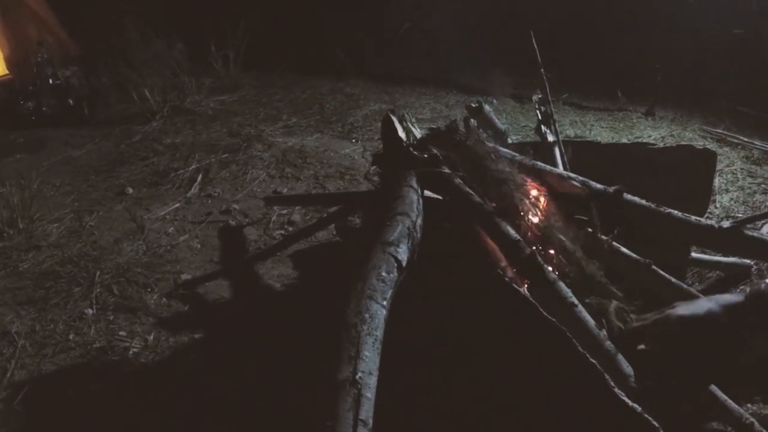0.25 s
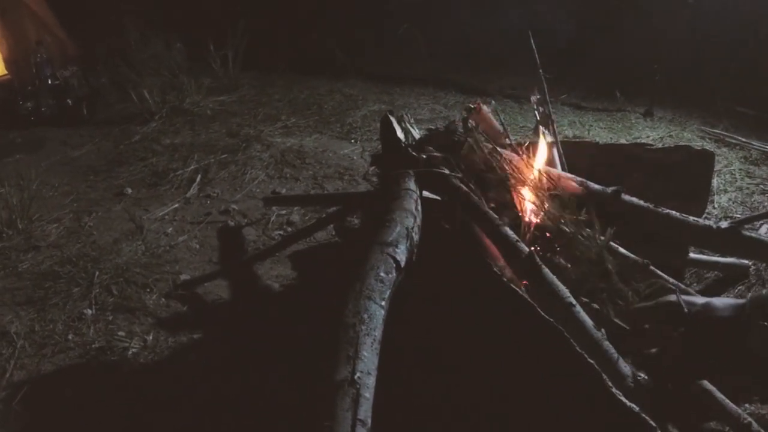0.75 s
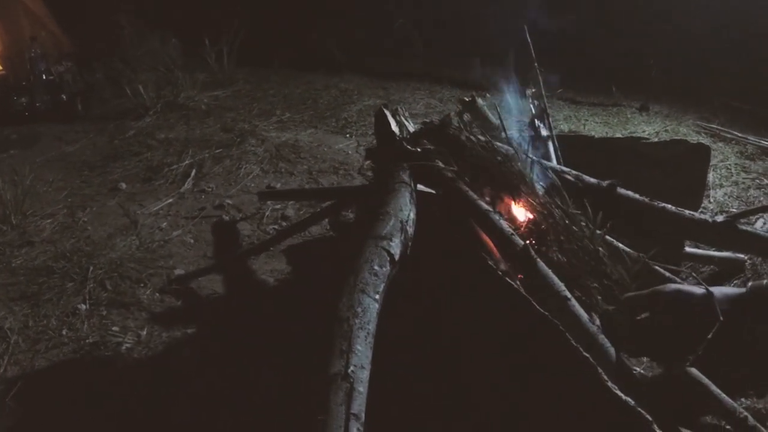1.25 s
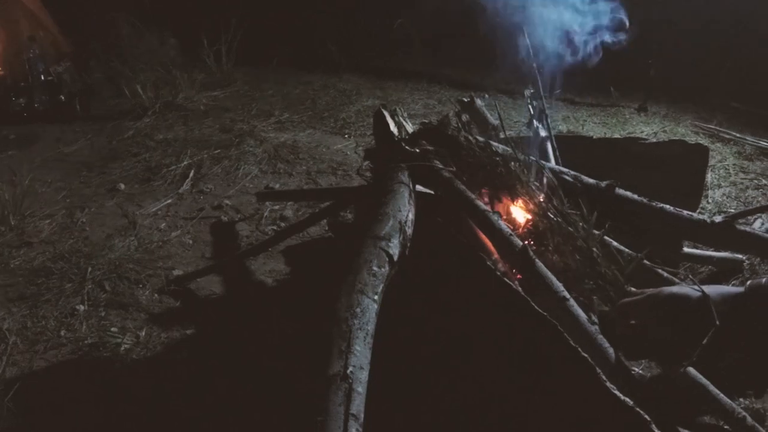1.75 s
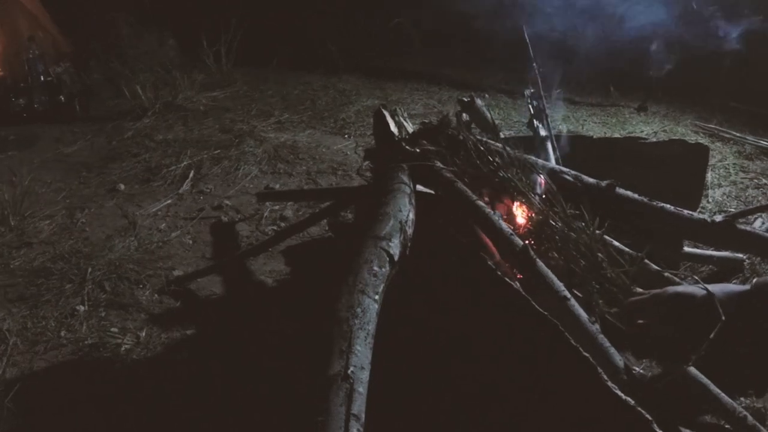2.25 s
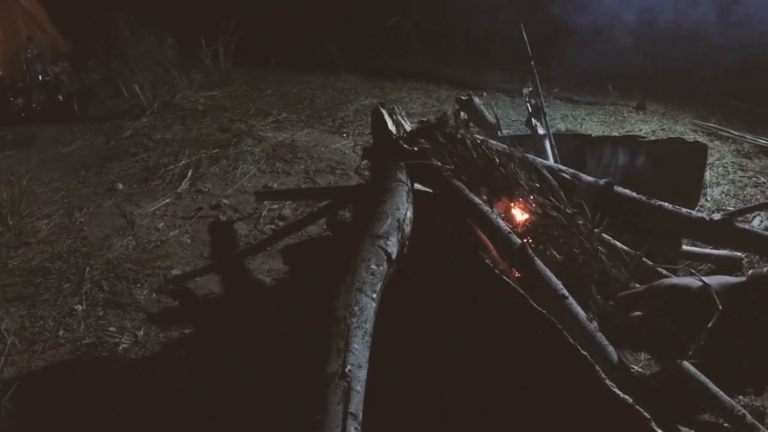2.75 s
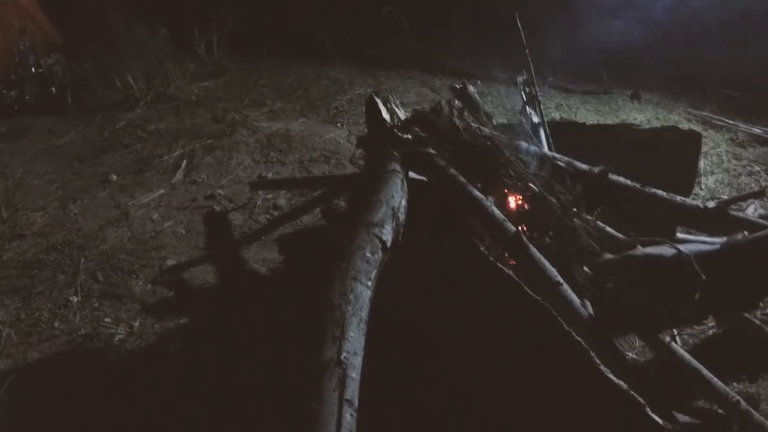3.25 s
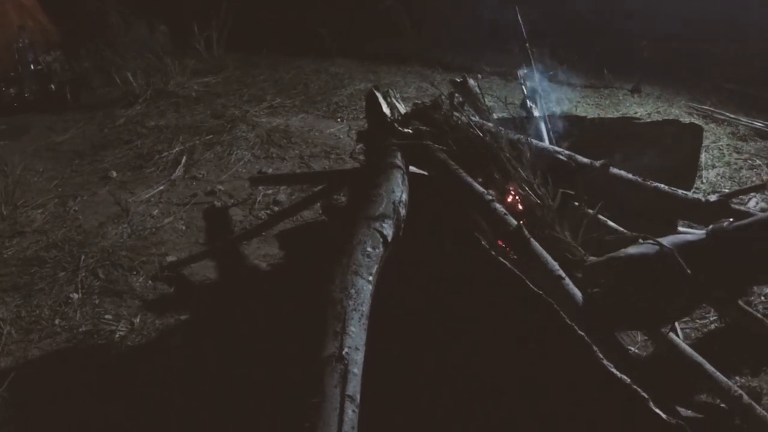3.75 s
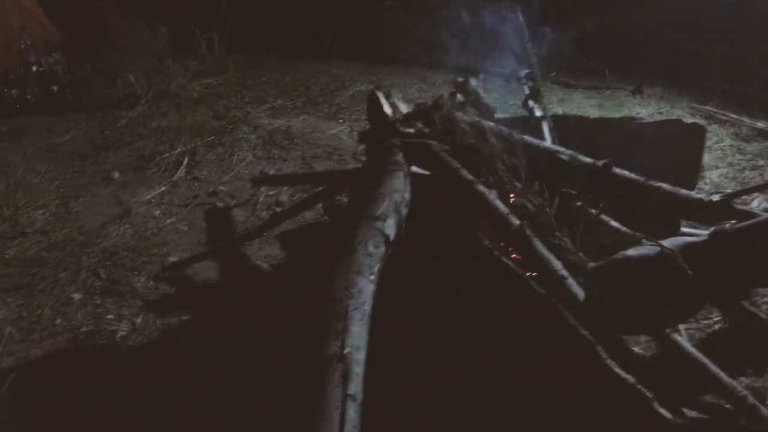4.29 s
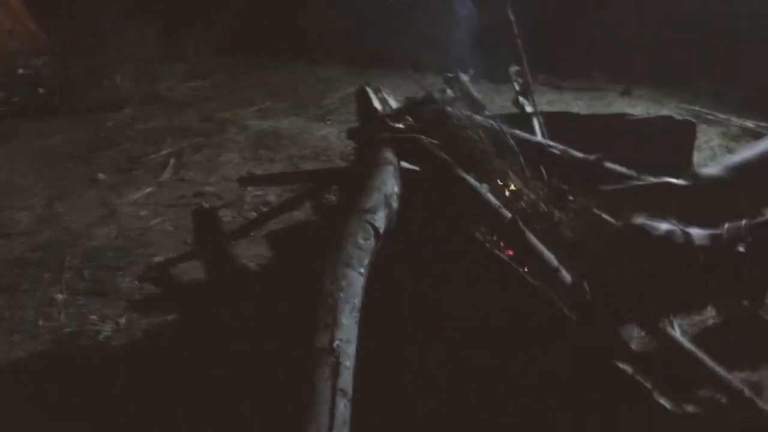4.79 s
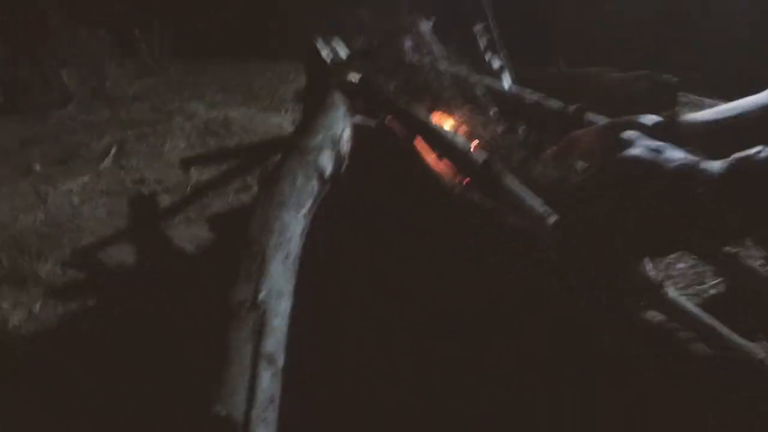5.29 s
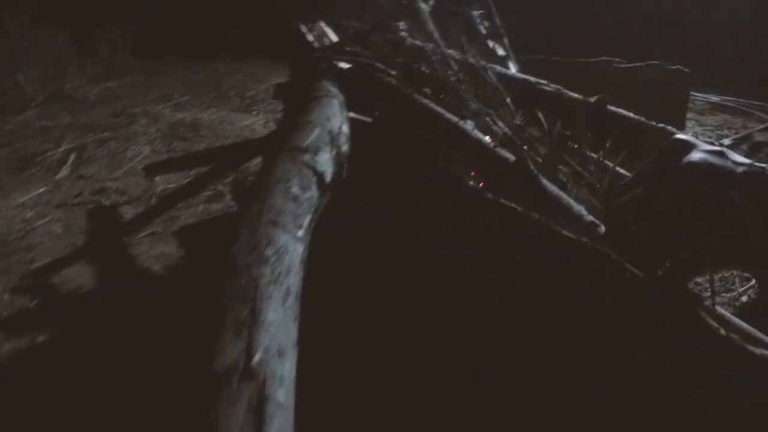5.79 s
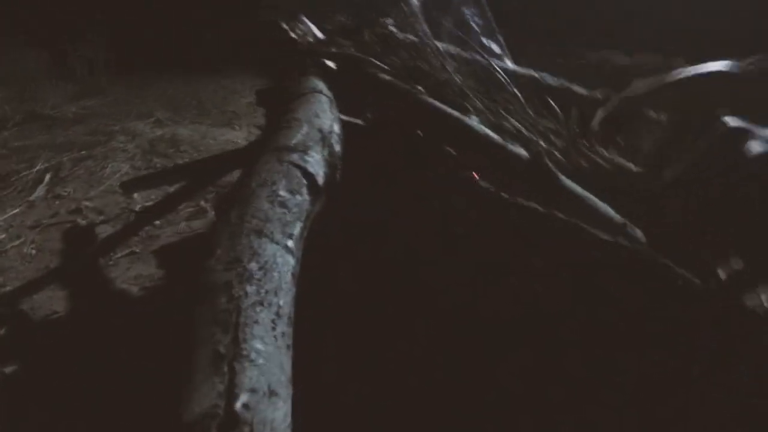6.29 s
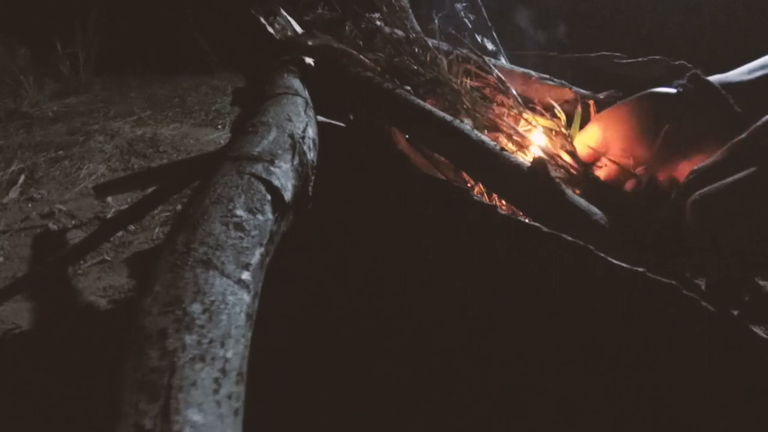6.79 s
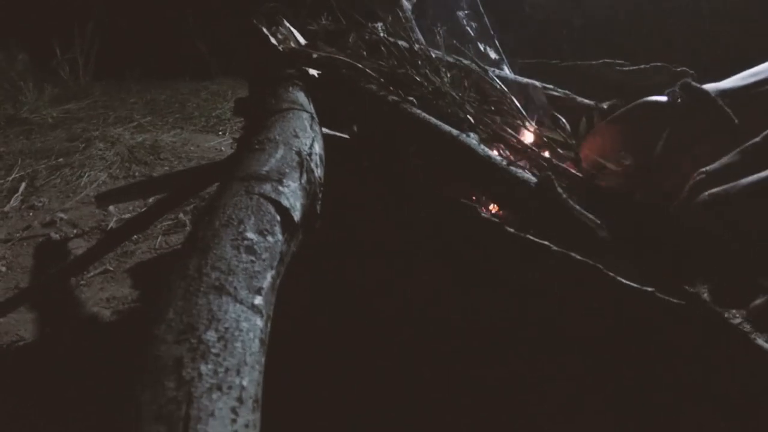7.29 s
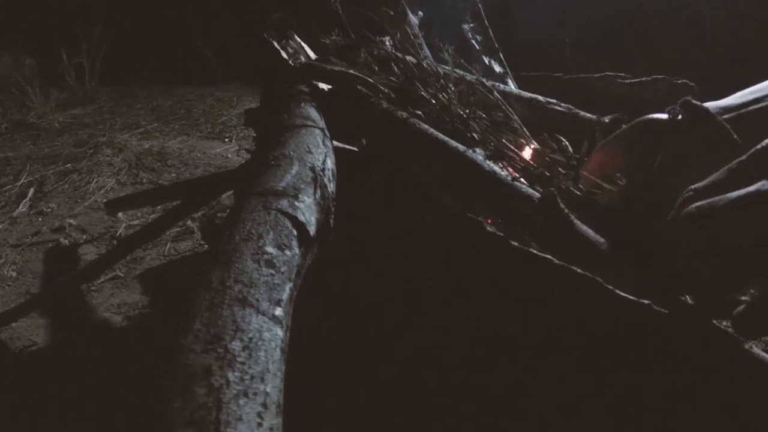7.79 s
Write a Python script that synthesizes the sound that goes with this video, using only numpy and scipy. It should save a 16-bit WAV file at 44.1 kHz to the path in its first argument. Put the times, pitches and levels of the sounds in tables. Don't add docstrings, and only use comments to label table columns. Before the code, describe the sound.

A quiet open-air night, in stereo. From 0 s a near cricket, slightly left, gives quick double chirps around 5 kHz, roughly five a second, over a dense shimmer of distant crickets and katydid trills and a very high buzz. Underneath, a far single-cylinder engine putters softly, quickening slightly after 2 s, with dull air rumble and barely felt breeze. Faint brushes of grass or sleeve pass; a tiny bump at 2.6 s, dry twig ticks near 4 s. At 4.35-4.55 s a hand shifts on the microphone: a cluster of hard, dry knocks and scuffs, the sharpest at 4.53 s, heavily right and overloading. Small thumps, twig ticks and cloth rustle trail to 5.7 s. A higher cricket enters at 5.2 s in paired notes. Soft bumps at 6.2-6.5 s, then at 6.68 s one short, bright flint-wheel scrape with metallic click. Insects swell gently to 8 s.

```python
import sys
import numpy as np
from scipy import signal
from scipy.io import wavfile
from scipy.ndimage import uniform_filter1d

SR = 44100
rng = np.random.default_rng(int(sys.argv[2]) if len(sys.argv) > 2 else 0)


def makeup_ratio(level_db):
    decades = np.asarray(level_db, float) / 20
    return 10 ** decades


def inscribe(sig):
    pcm = np.round(np.clip(np.atleast_2d(sig).T, -1, 1) * 32767)
    wavfile.write(sys.argv[1], SR, pcm.astype(np.int16))


N = 354563


def curve_at(curve, s):
    t, *columns = np.transpose(curve)
    return [np.interp(s, t, c) for c in columns]


def in_time(rows, silent=False):
    s = np.transpose(rows)[0]
    t = np.arange(N) / SR
    out = curve_at(rows, t)
    if silent:
        out[0] = np.where((t < s[0]) | (t > s[-1]), -200, out[0])
    return out


def rms_one(x):
    return x / np.sqrt(np.mean(x ** 2) + 1e-20)


def sides(pan_db):
    left = makeup_ratio(np.asarray(pan_db))
    return np.array([left, np.ones_like(left)]) * np.sqrt(2 / (1 + left ** 2))


def drift(rate):
    r = np.exp(-80 * np.pi * rate / SR)
    white = rng.standard_normal(N // 40 + 2002)
    slow = signal.lfilter([1], [1, -2 * r, r * r], white)[2000:]
    return np.interp(np.arange(N) / 40, np.arange(len(slow)), rms_one(slow))


def sos(x, design):
    return signal.sosfilt(design, x)


def band(x, hz, width_hz):
    edges = np.clip([hz - width_hz / 2, hz + width_hz / 2], 20, .45 * SR)
    return sos(x, signal.butter(2, edges, "band", fs=SR, output="sos"))


def add(out, s, sound):
    i = max(round(s * SR), 0)
    out[:, i:i + sound.shape[1]] += sound[:, :max(N - i, 0)]


def swells(rows):
    s, peak_db, rise, fall = np.array(rows)[:, :4, None].transpose(1, 0, 2)
    late = np.arange(N) / SR - s
    return makeup_ratio(peak_db - 20 * np.where(late < 0, -late / rise, late / fall))


def blows(table):
    out = np.zeros((2, N))
    for s, peak_db, hz, t60_ms, pan_db in table:
        t60_s = t60_ms / 1000
        t = np.arange(round(t60_s * SR)) / SR
        onset = (1 - np.exp(-t * abs(hz) * 5)) ** 2
        ring = -np.sin(2 * np.pi * hz * t) * makeup_ratio(-60 * t / t60_s) * onset
        add(out, s, makeup_ratio(peak_db) * sides(pan_db)[:, None] * ring / np.abs(ring).max())
    return out


def grains(per_s, uneven_db, alike):
    sizes = makeup_ratio(uneven_db * np.minimum(rng.exponential(1, (3, N)), 5)) * rng.choice([-1, 1], (3, N))
    both, left, right = sizes * (rng.random((3, N)) < per_s / SR)
    return rms_one(alike * both + (1 - alike) * np.array([left, right])) + 1e-18


def friction(strokes, pan_db, per_s, uneven_db, alike):
    clicks, gains, out = grains(per_s, uneven_db, alike), swells(strokes), 0
    bright_hz = np.array(strokes)[:, 4]
    for hz in 350 * 2. ** np.arange(6):
        rolloff = (1 + (hz / bright_hz) ** 2) ** -2
        out = out + rms_one(band(clicks, hz, 0.87 * hz)) * np.sqrt(rolloff @ gains ** 2)
    return sides(pan_db) * out


# start_s, left_over_right_db
HAND = [(2.6, -10), (4.33, -20), (4.42, -26), (4.56, -17), (4.66, -4), (5.1, -10), (6.25, -8), (6.4, 0)]


def on_housing(rows):
    return blows([(*row, curve_at(HAND, row[0])[0]) for row in rows])


# start_s, peak_db, ring_hz, t60_ms
KNOCKS = [(2.605, -50, 750, 17), (4.334, -24, 182, 14), (4.388, -22, 280, 10), (4.3915, -23, 294.5, 15),
          (4.3995, -20, 887, 8), (4.4075, -18.5, 364, 20), (4.4107, -18, 950, 12), (4.4135, -17, 1000, 8),
          (4.4163, -13, 800, 4.8), (4.4218, -9.5, 1825, 8.7), (4.4228, -7, 280, 11), (4.4245, -4, 520, 4.5),
          (4.433, -13.5, 1803, 3.7), (4.4335, -18, 250, 22), (4.46, -25.5, 176.8, 29),
          (4.5201, -27, 450, 9), (4.4225, -12, 4300, 3.1), (4.4345, -32, 3400, 4.3), (4.5395, -22, 420, 16),
          (4.5432, -29, 2117, 5), (4.562, -33, 253.3, 30), (4.678, -30, 480, 9), (5.108, -39, 648, 8),
          (5.3695, -38, 640, 6.2), (5.55, -50, 900, 13)]
# start_s, peak_db, ring_hz (negative = outward first), t60_ms, left_over_right_db
SNAP = [
    (4.5296, 2.5, 555, 4, -17),
    (4.5306, -8, 1060, 10, -17),
    (4.5315, -8, 1000, 3.5, -16),
    (4.5304, -7, -210, 12, -20),
]
# start_s, peak_db, ring_hz, t60_ms, left_over_right_db
CRACKS = [(4.4063, -36, 3500, 3, -14), (4.4068, -38, 6500, 2.5, -10), (4.4172, -36, 4500, 3, -12),
          (4.4208, -24, 4200, 3, -12), (4.4216, -24, 6300, 3, -8), (4.4226, -30, 14200, 3, -4),
          (4.4243, -28, 5500, 3, -8), (4.4278, -36, 6000, 2.5, -6), (4.4282, -36, 13500, 3, -4),
          (4.4335, -33, 6000, 3, -8), (4.441, -38, 2500, 4, -10), (4.5205, -34, 2000, 4, -14),
          (4.5297, -24, 3400, 3, -14), (4.5302, -17, 2300, 4, -16), (4.5345, -28, 1800, 8, -16),
          (4.5398, -30, 1700, 5, -16), (4.5298, -36, 8000, 2, -10), (4.8255, -44, 13800, 4, 4),
          (4.8275, -41, 4500, 4, 5), (4.8295, -40, 5500, 3, 5), (4.8305, -44, 11500, 4, 4),
          (4.849, -38, 1700, 6, -3), (4.858, -33, 600, 10, -3), (4.854, -40, 1000, 6, -3),
          (4.6855, -40, 1300, 6, -3), (4.7035, -42, 1700, 5, -3), (4.713, -44, 2000, 5, -3),
          (4.7595, -44, 2400, 4, -2), (4.8595, -37, 1900, 6, -3), (4.8665, -40, 1200, 6, -3),
          (6.6955, -40, 13000, 3, 3), (6.696, -40, 5000, 3, 2)]


def knocks():
    return on_housing(KNOCKS) + blows([*SNAP, *CRACKS])


# start_s, peak_db, ring_hz
THUMPS = [(2.602, -40, 199), (4.683, -38, 315), (4.702, -33, 183), (4.727, -37, 151), (4.76, -38, 291),
          (4.847, -36, 253), (5.085, -32, 215), (5.107, -32, 164), (5.114, -34, 196), (5.127, -39, 156),
          (5.187, -41, 205), (5.259, -39, 283), (5.27, -38, 347), (5.311, -39, 188), (5.368, -36, 188),
          (5.48, -38, 275), (5.545, -41, 151), (5.565, -38, 191), (5.662, -38, 178), (6.232, -36, 250),
          (6.287, -39, 186), (6.411, -38, 296), (6.475, -40, 258), (6.694, -36, 200), (6.704, -35, 235)]


def thumps():
    t60_ms = 28
    return on_housing([(*row, t60_ms) for row in THUMPS])


# peak_s, rms_db, rise_20db_s, fall_20db_s, bright_hz
SCUFF = [
    (4.37, -45, .015, .04, 1300),
    (4.405, -37, .07, .05, 1300),
    (4.4225, -21, .006, .012, 4050),
    (4.434, -31, .005, .014, 4000),
    (4.46, -52, .02, .12, 2000),
    (4.533, -36, .006, .045, 1200),
]


def scuffs():
    return friction(SCUFF, in_time(HAND)[0], 5000, uneven_db=3.5, alike=.6)


# time_s, rms_db
FLINT = [
    (6.666, -71.5),
    (6.669, -45),
    (6.675, -39),
    (6.681, -31),
    (6.684, -18.5),
    (6.688, -35),
    (6.693, -46),
    (6.7, -63),
]
# ring_hz, width_hz, level_db
FLINT_RINGS = [(2100, 1000, -19), (3400, 1600, -1), (5250, 900, -8), (8200, 1600, -17), (13500, 3400, -10)]


def flint():
    clicks = grains(6900, uneven_db=2.5, alike=1.0)
    rings = sum(makeup_ratio(db) * rms_one(band(clicks, hz, width_hz)) for hz, width_hz, db in FLINT_RINGS)
    return makeup_ratio(in_time(FLINT, silent=True)[0]) * sides(2.2)[:, None] * rings


# ring_hz, peak_db, t60_ms, left_over_right_db
STRIKE = [(325, -26, 13, 1), (2300, -28, 3.2, 5), (4300, -19, 3, 0), (3350, -11, 4, 3),
          (5200, -17, 2.5, -10), (12000, -22, 3, 8)]


def lighter():
    release_s, top_hz = 6.684, 15900
    body = blows([(release_s, db, hz, t60_ms, pan_db) for hz, db, t60_ms, pan_db in STRIKE])
    return sos(flint() + body, signal.cheby2(10, 45, top_hz, fs=SR, output="sos"))


# start_s, peak_db, ring_hz
TICKS = [(3.9213, -46, 2750), (3.922, -40, 3500), (3.9213, -45, 4800), (4.02, -52, 2200),
         (4.2085, -46, 4370), (4.2085, -49, 6600), (4.2085, -51, 3000), (4.5201, -41, 4500),
         (4.5668, -45, 8000), (4.646, -44, 5200), (4.776, -45, 4700), (4.6139, -31, 3020),
         (4.6141, -28, 7360), (4.6142, -26, 13000), (4.6448, -42, 2980), (4.7515, -43, 3050),
         (4.7517, -41, 7200), (4.772, -44, 4260), (4.826, -39, 1500), (4.6955, -43, 2400),
         (5.4844, -46, 4540), (7.505, -47, 4200), (7.5052, -47, 13500)]


def twig_ticks():
    cycles, pan_db = 13, 2.5
    return blows([(s, db, hz, cycles * 1000 / hz, pan_db) for s, db, hz in TICKS])


# peak_s, rms_db, rise_20db_s, fall_20db_s, bright_hz
RUSTLE = [
    (4.68, -43, .004, .1, 1600),
    (4.75, -54, .3, .5, 4500),
    (4.828, -39, .005, .03, 3000),
    (4.86, -41, .05, .05, 1820),
    (5.15, -60, .5, .45, 2000),
    (6.41, -58, .04, .07, 500),
    (6.7, -60, .03, .25, 6000),
]


def rustle():
    pan_db = .5
    return friction(RUSTLE, np.full(N, pan_db), 6000, uneven_db=3, alike=.5)


# peak_s, rms_db, rise_20db_s, fall_20db_s
HAZE = [
    (4.423, -41, .014, .028),
    (4.6, -57, .6, .8),
    (4.828, -48, .01, .03),
    (4.86, -58, .1, .4),
    (6.7, -53.5, .012, .19),
]


def haze():
    clicks = grains(4000, uneven_db=4.5, alike=.3)
    return np.sqrt(np.sum(swells(HAZE) ** 2, axis=0)) * rms_one(band(clicks, 10500, 8000))


# peak_s, rms_db, rise_20db_s, fall_20db_s, centre_hz
BRUSHES = [
    (.3, -76, 1.5, 2.5, 1250),
    (1.35, -71, .9, .7, 3000),
    (2.53, -72, .15, .15, 1400),
    (3.96, -65, .08, .9, 3200),
    (5.2, -68, .3, .6, 3000),
    (5.85, -66, .25, .3, 2500),
    (6.41, -59, .05, .07, 950),
    (7.12, -66, .08, .25, 1300),
    (7.45, -68, .4, .4, 2700),
]


def brushes():
    clicks = grains(5000, uneven_db=2.5, alike=.4)
    return sum(gain * rms_one(band(clicks, row[4], .6 * row[4])) for gain, row in zip(swells(BRUSHES), BRUSHES))


def wing_note(start_hz, fall_hz, length_s, bend, phase):
    u = np.arange(round(length_s * SR)) / (length_s * SR)
    pitch_hz = start_hz - fall_hz * u ** bend
    return np.sin(np.pi * u) * np.sin(np.cumsum(pitch_hz) * 2 * np.pi / SR + phase)


def cricket(notes, start_hz, fall_hz, length_s, bend, right_leads, echo_db):
    spread_db, echo_s = 3.0, .0057
    out, chance = np.zeros((2, N)), rng.random((len(notes), 2))
    for (s, peak_db, pan_db), (a, c) in zip(notes, chance):
        phases = 2 * np.pi * a + np.array([[0], [right_leads]])
        note = wing_note(start_hz * (1 + .006 * (c - .5)), fall_hz, length_s, bend, phases)
        add(out, s, makeup_ratio(peak_db + spread_db * (c - .5)) * sides(pan_db)[:, None] * note)
    return out + makeup_ratio(echo_db) * np.roll(out[::-1], round(echo_s * SR), axis=1)


# first_s, last_s, period_s
NEAR_RUNS = [(.072, .072, .205), (.244, 1.889, .2056), (2.093, 4.164, .2071), (4.376, 4.583, .207),
             (4.759, 5.583, .206), (5.755, 6.791, .2072), (6.996, 7.816, .205), (7.996, 7.996, .205)]
NEAR_TRIPLES_S = [3.96, 4.17, 4.37, 4.76, 5.17, 6.37, 6.58, 8.0]
# time_s, peak_db, left_over_right_db
NEAR_TURN = [(0, -50, 15), (.6, -50, 6), (3.5, -49, 4), (4.25, -47.5, 3), (4.7, -51, 2.5), (5.4, -54, 1.5),
             (6.0, -49.5, 2.5), (6.6, -52, 3.5), (8.04, -50, 6)]


def near_cricket():
    step_s, lead_db, trail_db = .0345, -3.0, -.6
    single_s = 5.72
    loud = np.concatenate([np.arange(a, b + .01, period) for a, b, period in NEAR_RUNS])
    lead = loud - step_s
    lead = np.delete(lead, np.abs(lead - single_s).argmin())
    third = loud[np.abs(loud[:, None] - np.array(NEAR_TRIPLES_S)).argmin(0)] + step_s
    s = np.concatenate([lead, loud, third])
    db, pan_db = curve_at(NEAR_TURN, s)
    db = db + np.repeat([lead_db, 0, trail_db], [len(lead), len(loud), len(third)])
    return cricket(list(zip(s, db, pan_db)), 5220, 1130, .022, bend=1.1, right_leads=1.8, echo_db=-12)


# time_s, peak_db, left_over_right_db
HIGH_TURN = [(5.24, -56, 8), (5.5, -53, 7), (6.2, -54.5, 0), (7.2, -52.5, -2.5), (8.04, -53, -8)]


def high_cricket():
    first_s, period_s, pair_s = 5.244, .2414, .054
    answer_late_s, answer_db = .145, -7
    first = np.arange(first_s, N / SR, period_s)
    s = np.concatenate([first, first + pair_s])
    db, pan_db = curve_at(HIGH_TURN, s)
    notes = [*zip(s, db, pan_db), *zip(s + answer_late_s, db + answer_db, pan_db)]
    return cricket(notes, 7450, 420, 0.03, bend=3.0, right_leads=1.1, echo_db=-11)


# start_s, peak_db, left_over_right_db
LOW_NOTES = [(4.904, -55, -12.5), (5.355, -53, -18), (5.438, -51.5, -7), (5.575, -60, -12.5),
             (5.649, -54, -10.5), (5.705, -61, 2), (5.906, -52.5, -2.5), (6.199, -57.5, -8),
             (6.38, -50, -6.5), (7.077, -59, -2.5), (7.183, -61.5, -3), (7.376, -61.5, -5.5),
             (7.435, -63, 1), (7.629, -61, -1), (7.681, -56, -7.5), (7.872, -56, -4)]


def low_cricket():
    return cricket(LOW_NOTES, 6950, 172.4, 0.023, bend=1.4, right_leads=1.3, echo_db=-18)


def katydid(controls, width_hz, per_s, second, stroke, steady):
    level_db, pan_db, centre_hz = controls
    cycle = np.cumsum(per_s * (1 + .002 * drift(1.7))) / SR % 1
    gate = np.exp(-((cycle - .2) / stroke) ** 2) + .8 * np.exp(-((cycle - .2 - second) / stroke) ** 2)
    noise = rng.standard_normal((2, 2, N)) * (steady + gate)
    a, b = sos(noise, signal.butter(4, width_hz / 2, fs=SR, output="sos"))
    turn = np.cumsum(centre_hz) * 2 * np.pi / SR
    return makeup_ratio(level_db) * sides(pan_db) * rms_one(a * np.cos(turn) + b * np.sin(turn))


# time_s, rms_db, left_over_right_db, centre_hz
TRILL = [(0, -68, 1, 8000), (1.3, -66.5, 1.5, 7970), (3.0, -68, 1.5, 7970), (4.3, -64.5, -1.5, 7990),
         (5.1, -68, -3, 8000), (5.4, -67, -1, 8200), (6.3, -63.5, 0, 8200), (8.04, -60, -1, 8200)]
# centre_s, depth_db, length_s
TRILL_PAUSES = [
    (1.34, 5, .05),
    (2.93, 6, .07),
    (5.25, 6, .12),
    (6.23, 5, .05),
    (7.575, 12, .042),
]


def katydid_trill():
    level_db, pan_db, centre_hz = in_time(TRILL)
    t = np.arange(N) / SR
    pauses_db = sum(db * np.exp(-((t - s) / length_s) ** 2) for s, db, length_s in TRILL_PAUSES)
    controls = level_db - pauses_db, pan_db, centre_hz
    return katydid(controls, 900, per_s=42.6, second=.31, stroke=.07, steady=.55)


# time_s, rms_db
BUZZ = [(0, -63.7), (2.5, -64.3), (5.5, -65.2), (6.2, -64.5), (6.9, -61), (8.04, -59)]


def katydid_buzz():
    pan_db, centre_hz = 3.5, 14200
    controls = in_time(BUZZ)[0], np.full(N, pan_db), np.full(N, centre_hz)
    return katydid(controls, 1200, per_s=187.5, second=.42, stroke=.1, steady=1.3)


# start_hz, spread_hz, fall_hz, note_s, notes_per_s, rms_db
CROWDS = [
    (5300, 160, 520, 0.014, 990, -66),
    (7335, 97, 300, 0.037, 310, -65.5),
    (6975, 170, 336, 0.05, 300, -64.5),
    (2450, 200, 50, .025, 150, -79),
]
# time_s, gain_db, left_over_right_db
CROWD_TURN = [(0, 3.5, 1.5), (2, 2, -1), (4.3, 4.5, -1.5), (5.2, 6, -1), (6.5, 4, -1.5), (8.04, 4.5, -1.5)]


def crowds():
    gain_db, pan_db = in_time(CROWD_TURN)
    out = 0
    for start_hz, spread_hz, fall_hz, length_s, per_s, level_db in CROWDS:
        for step in np.linspace(-1.5, 1.5, 7):
            strokes = (rng.random((2, N)) < per_s / 7 / SR) * rng.standard_normal((2, N))
            note = wing_note(start_hz + step * spread_hz, fall_hz, length_s, bend=1.5, phase=0)
            sound = rms_one(signal.fftconvolve(strokes, note[None], axes=1)[:, :N])
            out = out + makeup_ratio(level_db - 8 - 2.7 * step ** 2) * sound
    return out * makeup_ratio(gain_db) * sides(pan_db)


# centre_hz, width_hz, rms_db
FAR_RASPS = [(4010, 700, -75), (5950, 800, -75.5), (9100, 700, -76.5), (10040, 700, -76), (11200, 600, -79),
             (12700, 700, -72.5)]


def far_rasps():
    white = rng.standard_normal((2, N))
    return sum(makeup_ratio(db + 2 * drift(2)) * rms_one(band(white, hz, width_hz)) for hz, width_hz, db in FAR_RASPS)


# time_s, firings_per_s, bark_rms_db, hum_rms_db
ENGINE = [(0, 20.61, -54.5, -66), (.7, 20.61, -55.5, -64), (.9, 20.85, -58, -62), (1.7, 20.85, -59, -62),
          (1.95, 20.6, -60, -62), (2.2, 23.9, -59, -58), (2.65, 24, -59, -58), (2.95, 24.8, -56.5, -57),
          (4.1, 24.9, -56, -57), (4.8, 24.6, -59, -60), (5.8, 24.4, -57.5, -59), (6.0, 24, -59, -59),
          (6.2, 22.8, -58, -58), (6.8, 22.6, -59, -61), (7.3, 22.8, -56, -63), (7.7, 22.8, -59, -64),
          (8.04, 23.6, -59, -64)]


def engine():
    first_firing_s, spread_db = .0225, 1.2
    per_s, bark_db, hum_db = in_time(ENGINE)
    turns = np.floor(np.cumsum(per_s) / SR - first_firing_s * per_s[0])
    firings = np.diff(turns, prepend=turns[0]) * makeup_ratio(spread_db * rng.standard_normal(N)) + 1e-18
    bark = rms_one(band(band(firings, 255, 180), 255, 180))
    hum = rms_one(band(band(firings, 150, 40), 150, 40))
    return makeup_ratio(bark_db) * bark + makeup_ratio(hum_db) * hum


# time_s, rms_db
BREEZE = [(0, -84), (1.5, -81), (3.3, -75), (5.2, -76), (7, -78), (8.04, -85)]


def breeze():
    puffs = rms_one(band(rng.standard_normal((2, N)), 42, 40)) * makeup_ratio(3.0 * drift(4.0))
    return makeup_ratio(in_time(BREEZE)[0] + 2.0) * puffs


# band_hz, level_db_per_hz
AIR = [(25, -33), (60, -34.5), (100, -14), (150, -6), (260, -6.5), (400, -14), (700, -25.5), (1100, -35),
       (1900, -41.5), (3000, -39.5), (4700, -33), (5800, -53.5), (8000, -44.5), (14000, -45.5)]
# band_hz, correlation
LIKENESS = [(60, 0.5), (180, 0.97), (550, 0.51), (1650, -0.36), (4970, 0.69), (15000, 0.75)]


def night_air(rumble_db, patchy_db):
    out, together, edges = 0, drift(1.5), 22 * 2 ** np.arange(0, 9.7, 1 / 3)
    white = rng.standard_normal((2, 2, N))
    air_hz, air_db = np.transpose(AIR)
    like_hz, likeness = np.transpose(LIKENESS)
    for k, (low, high) in enumerate(zip(edges, edges[1:])):
        mid, side = sos(white[k % 2], signal.butter(2, [low, high], "band", fs=SR, output="sos"))
        log_hz = np.log(low * high) / 2
        alike = np.clip(np.interp(log_hz, np.log(like_hz), likeness), -1, 1)
        level_db = np.interp(log_hz, np.log(air_hz), air_db)
        gain = makeup_ratio(level_db + patchy_db * (0.72 * together + drift(6)))
        out = out + gain * (np.sqrt(1 + alike) * mid + np.sqrt(1 - alike) * side * [[1], [-1]])
    return makeup_ratio(rumble_db) * rms_one(out)


def thin_gap(x):
    gap = sos(x, signal.butter(1, [5450, 6400], "band", fs=SR, output="sos"))
    return x - np.clip(.62 + .2 * drift(1.5), 0, 1) * gap


def scene():
    port_cut_hz, close_top_hz, quiet_top_hz = 85, 16600, 15200
    close = knocks() + thumps() + scuffs() + lighter() + twig_ticks()
    close = sos(close, signal.butter(2, port_cut_hz, "high", fs=SR, output="sos"))
    close = sos(close, signal.cheby2(10, 45, close_top_hz, fs=SR, output="sos"))
    insects = near_cricket() + high_cricket() + low_cricket() + katydid_trill() + katydid_buzz()
    insects = insects + crowds() + far_rasps()
    night = thin_gap(insects + engine() + breeze() + night_air(rumble_db=-52.6, patchy_db=1.3))
    night = night + rustle() + haze() + brushes()
    night = sos(night, signal.ellip(10, 1, 60, quiet_top_hz, fs=SR, output="sos"))
    return close + night


def drop_faint(x, floor_db):
    forgets_above_hz, wavers_db = 1900, 3.0
    hz, _, cells = signal.stft(x, fs=SR, nperseg=2048)
    edges = np.arange(0, 1025, 8)
    power = np.add.reduceat(np.abs(cells) ** 2, edges, axis=1).mean(0) / 8
    waver = uniform_filter1d(rng.standard_normal(power.shape), size=3, axis=1) * np.sqrt(3)
    kept = (power > makeup_ratio(floor_db + wavers_db * waver) ** 2) | (hz[edges, None] < forgets_above_hz)
    return signal.istft(cells * np.repeat(kept, 8, axis=0)[:1025], nperseg=2048)[1][:, :N]


def low_pass(x):
    return signal.sosfilt(signal.butter(12, 16500, fs=SR, output="sos"), x)


def record(dry):
    kept = drop_faint(dry, floor_db=-98.7)
    rounded = kept / (1 + np.abs(kept) ** 6) ** (1 / 6)
    return low_pass(rounded)


dry = scene()
out = record(dry)
inscribe(out)
```